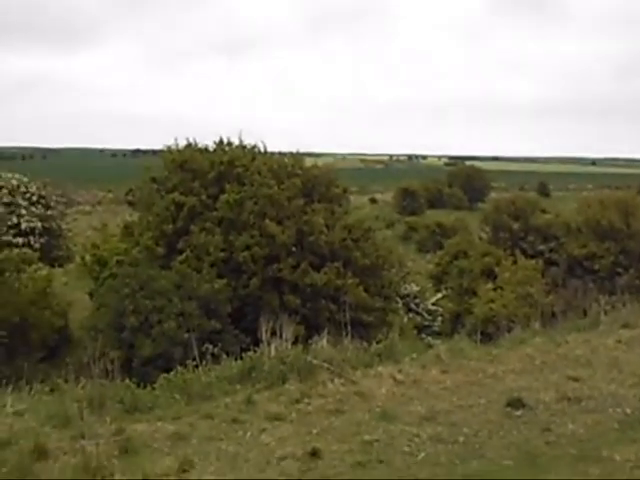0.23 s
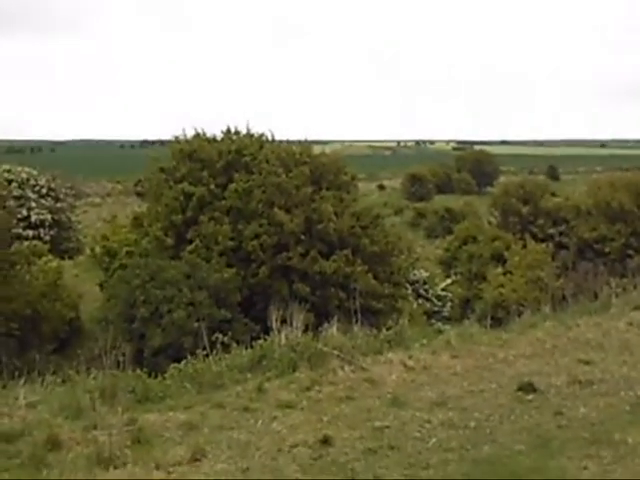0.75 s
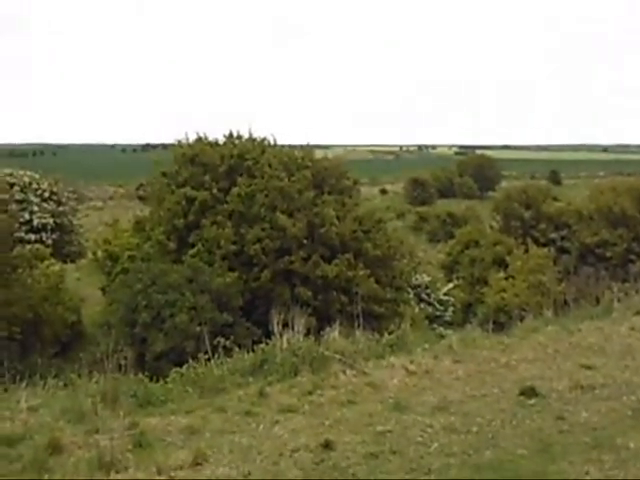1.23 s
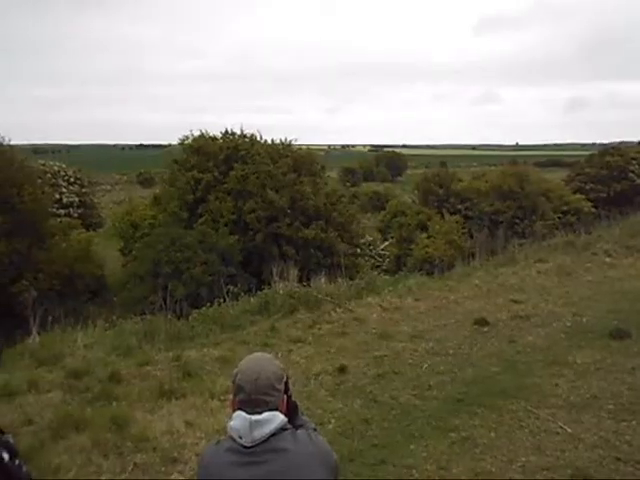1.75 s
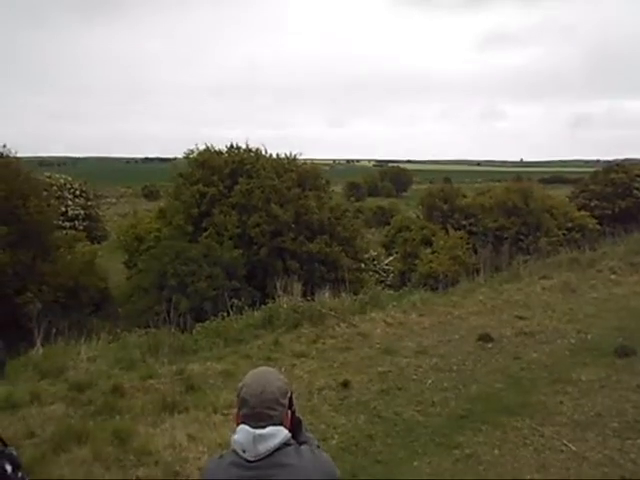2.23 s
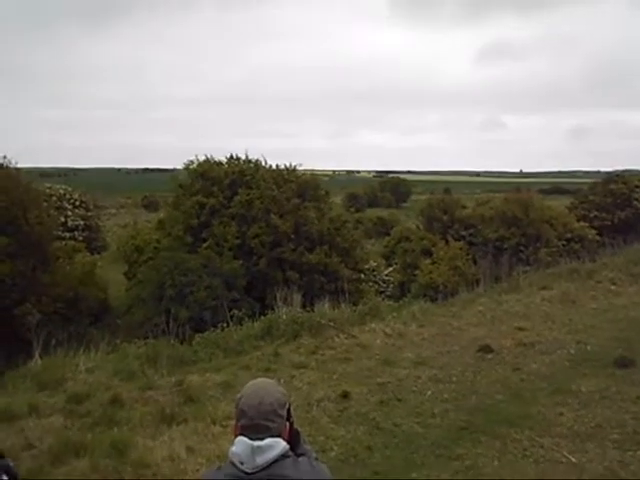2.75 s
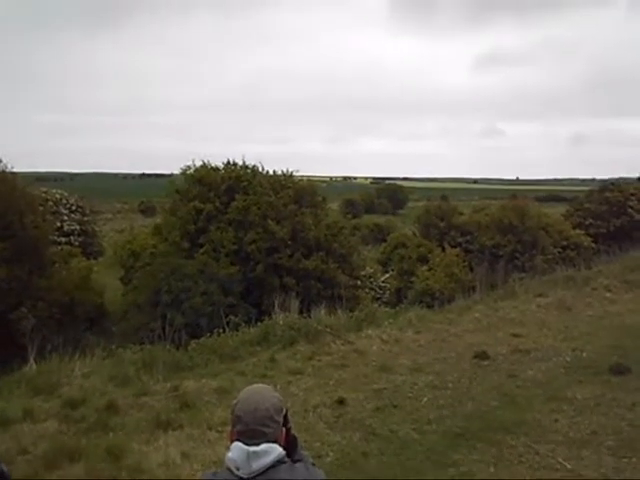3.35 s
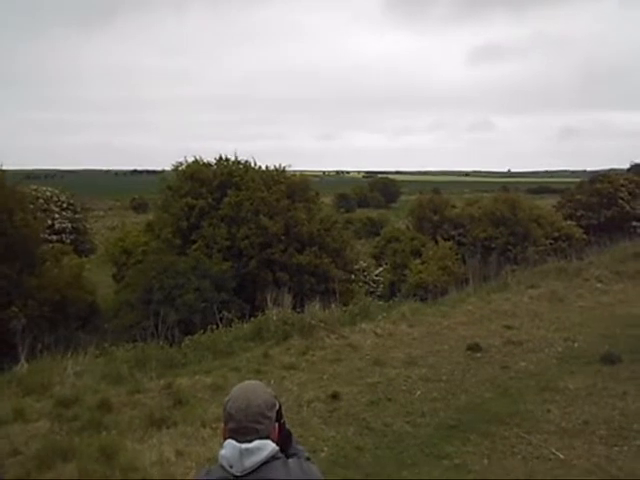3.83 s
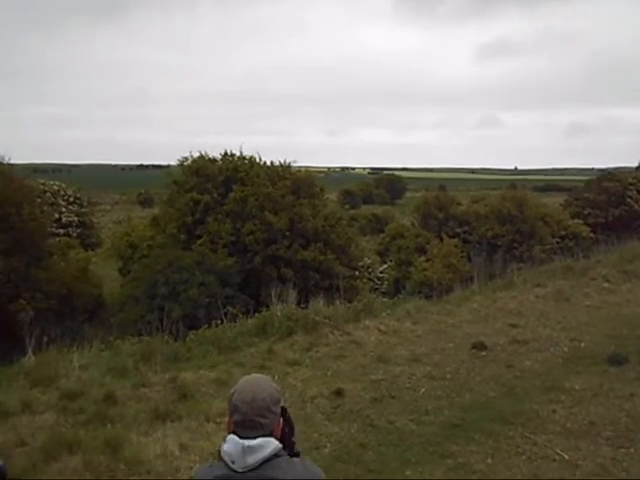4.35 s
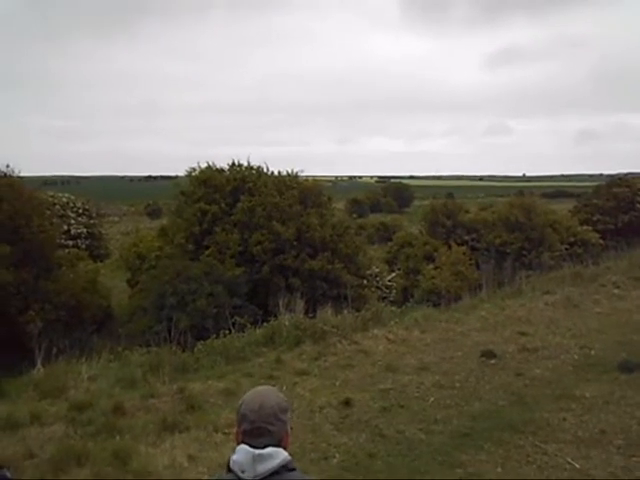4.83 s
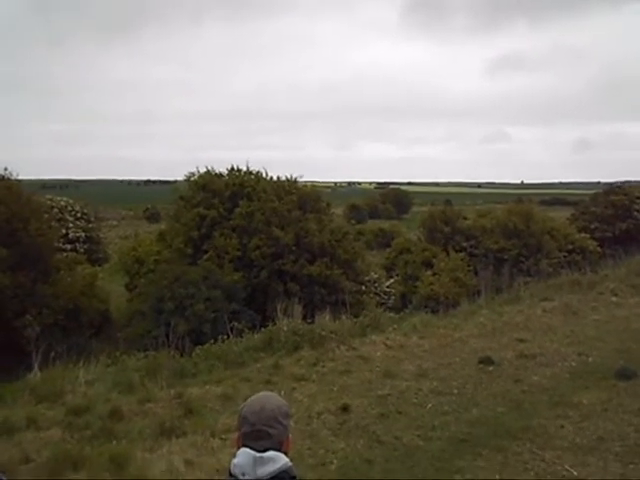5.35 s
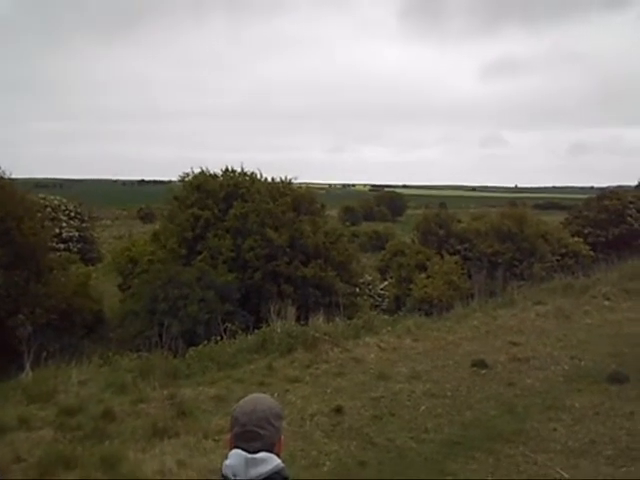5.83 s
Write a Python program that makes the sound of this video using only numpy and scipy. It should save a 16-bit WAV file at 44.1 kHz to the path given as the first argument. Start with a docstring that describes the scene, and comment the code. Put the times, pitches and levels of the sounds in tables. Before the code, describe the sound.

Small birds sing from bushes in open country, opening with a rattle of low chucks, then quick chirps, gliding whistles, high trills and faint buzzy churrs. Wind rumbles and thumps on the hand-held microphone, growing stronger toward the end. A soft hiss of distant leaves and a few handling clicks lie underneath, and the sound briefly drops out early on.

```python
"""Warblers sing from scrub across open fields: quick chirps, gliding whistles and buzzy churrs,
pitch-swept tones smeared by the bushes. Wind buffets a hand-held camera's microphone, which also hears
handling ticks and the hiss of far leaves. The sound drops out once and the hiss climbs back from faint.
Half-rate sampling gives the notes mirror images in the top octave, up to the band limit."""
import sys
import numpy as np
from scipy import signal
from scipy.fft import rfft, irfft, next_fast_len
from scipy.io import wavfile
from scipy.ndimage import uniform_filter1d, map_coordinates

SR = 44100
rng = np.random.default_rng(int(sys.argv[2]) if len(sys.argv) > 2 else 0)


def int16_out(signal):
    """Quantize to a 16-bit WAV file."""
    q = np.round(np.clip(np.atleast_2d(signal).T, -1, 1) * 32767)
    wavfile.write(sys.argv[1], SR, q.astype(np.int16))


N = 268569
DROP_START_S, DROP_END_S, OVERSHOOT_END_S = 1.417, 1.4365, 1.4845
CLEAR_HZ = 2000  # lower notes never count as faint


def short_notes():
    """Rows of (time [s], length [s], start, middle, end [Hz], level [dB], peak [0-1], steepness,
    flutter [dB])."""
    # rising, falling, near-level notes: (time [s], length [s], middle pitch [Hz], level [dB])
    hooks = [(2.388, 0.021, 4750, -21.5), (2.415, 0.024, 4060, -18), (2.418, 0.016, 3600, -20),
             (2.448, 0.03, 4320, -21), (2.453, 0.033, 3710, -20), (5.435, 0.023, 2480, -36),
             (5.533, 0.019, 3340, -31)]
    droops = [(.417, 0.013, 1870, -17.5), (5.506, 0.048, 3300, -32.5), (5.541, .05, 2890, -31.5)]
    pips = [(.18, 0.078, 4010, -39), (.435, .085, 3610, -43), (.758, 0.05, 4360, -39),
            (2.121, 0.045, 7270, -28), (2.762, 0.0099, 1675, -24), (3.181, 0.027, 2990, -30.5),
            (4.209, 0.012, 5230, -29), (4.531, 0.025, 6500, -33.5), (5.458, 0.012, 3080, -32),
            (5.477, 0.011, 3000, -31)]
    # tiny pips stepping down in pitch: (time [s])
    run_s = [2.188, 2.217, 2.234, 2.26, 2.29, 2.312, 2.33]
    # falling trill notes: (time [s], length [s], start [Hz], middle [Hz], end [Hz], level [dB])
    slides = [(2.141, 0.015, 7640, 6410, 6050, -16.5), (4.558, 0.039, 9250, 6970, 6470, -26.5),
              (4.598, .029, 9000, 7060, 6700, -23), (4.635, .034, 9000, 7480, 7000, -23.5),
              (4.927, 0.02, 7100, 6660, 6400, -25), (4.962, 0.0181, 7550, 7000, 5940, -19.5),
              (4.994, 0.028, 7870, 7170, 6450, -18.5), (5.036, .022, 8650, 7320, 6680, -13.5),
              (5.116, .07, 7200, 6640, 5830, -47)]
    # low rattle of falling chucks and soft rising lead-ins: (time [s], level [dB])
    chucks = [(0.233, -14), (0.333, -11), (0.501, -10.5), (0.604, -15.5), (0.707, -13.5), (0.824, -14.5),
              (0.922, -15)]
    lead_ins = [(0.301, -27), (0.465, -23.5), (0.568, -27.5), (0.671, -30.5), (0.785, -26), (0.882, -26),
                (1.032, -28.5)]
    fall_hz_per_s = 12300
    run = [(s, .0057, 5300 - fall_hz_per_s * (s - run_s[0]), -37) for s in run_s]
    notes = []
    for rows, start_ratio, end_ratio in (hooks, .73, 1), (droops, 1.07, .685), (pips + run, .95, 1):
        for s, length_s, hz, db in rows:
            notes.append((s, length_s, start_ratio * hz, hz, end_ratio * hz, db, .45, 1.1, 3.8))
    notes += [(*row, .62, .8, 3.5) for row in slides]
    notes += [(s, .017, 2735, 1800, 870, db, .07, 1.5, 1.5) for s, db in chucks]
    notes += [(s, .021, 1100, 1270, 1480, db, .6, 1.3, 2.5) for s, db in lead_ins]
    return notes


def chirps():
    """Short notes bend through three pitches; faint or very high ones come from deep in the scrub."""
    near, far = np.zeros(N), np.zeros(N)
    hiss_db = hiss_level_db()
    for s, length_s, start_hz, mid_hz, end_hz, db, peak, steepness, depth_db in short_notes():
        u = np.linspace(0, 1, round(length_s * SR))
        hz = start_hz * 2 * (u - .5) * (u - 1) + mid_hz * 4 * u * (1 - u) + end_hz * 2 * u * (u - .5)
        faint = db < hiss_db[round(s * SR)] + 11 and mid_hz > CLEAR_HZ
        flutter_db = (5.5 if faint else depth_db) * wobble(170, len(u))
        hz *= 1 + (.016 if faint else .001 * depth_db) * wobble(150, len(u))
        gain = amp(db + flutter_db) * swell(u, peak, steepness)
        sing(far if faint or start_hz > 7000 else near, s, hz, gain, octave_db=-42)
    return near, far


def whistles():
    """Gliding notes; faint ones come from far off and waver more."""
    # one contour per note: (time [s], pitch [Hz], level [dB])
    contours = [
        [(.18, 2510, -49), (.22, 4420, -36.5), (.33, 4384, -52)],
        [(.8, 3560, -48), (.9, 3225, -49), (1.1, 3166, -54)],
        [(1.633, 2690, -50), (1.645, 2570, -44), (1.656, 2580, -30), (1.665, 1840, -39), (1.676, 1240, -57)],
        [(1.84, 6340, -22), (1.846, 8030, -22.5), (1.855, 8420, -23.5), (1.866, 8040, -30), (1.878, 6750, -17),
         (1.89, 5850, -19.5), (1.905, 6200, -30)],
        [(2.93, 6080, -22), (2.96, 6270, -20.5), (3.105, 6696, -19.5), (3.119, 6960, -29), (3.13, 6770, -11.5),
         (3.142, 6924, -9.5), (3.16, 6882, -10.5), (3.17, 6900, -21)],
        [(3.35, 4560, -27), (3.365, 4800, -18.5), (3.39, 4720, -26), (3.41, 4840, -22), (3.425, 5670, -28.5),
         (3.445, 5650, -28), (3.46, 5350, -18), (3.475, 3920, -20), (3.485, 4000, -40)],
        [(3.865, 3960, -31), (3.877, 4050, -18), (3.884, 3780, -27), (3.892, 3830, -12), (3.901, 3950, -24),
         (3.91, 3920, -12), (3.93, 4080, -21), (3.955, 4280, -31.5), (4.0, 4080, -27)],
        [(4.004, 3900, -33), (4.013, 3970, -27), (4.025, 3755, -7.5), (4.037, 3150, -21), (4.045, 3395, -22)],
        [(5.09, 1677, -45), (5.15, 1660, -36), (5.23, 1642, -34.5), (5.32, 1637, -45), (5.44, 1674, -43)],
        [(5.262, 1016, -48), (5.285, 1167, -42), (5.335, 970, -44)],
        [(5.843, 2130, -40), (5.865, 2130, -30.5), (5.89, 2240, -13.5), (5.91, 2423, -22), (5.925, 2740, -25),
         (5.938, 2730, -40.5)],
        [(5.941, 3390, -36), (5.952, 3310, -4.5), (5.961, 2930, -15), (5.97, 2850, -17.5), (5.985, 2320, -17.5),
         (6.0, 2074, -25), (6.017, 2030, -41)],
    ]
    # second partial of each note: (relative level [dB])
    octaves_db = [-36, -40, -15, -40, -45, -19, -25, -34, -11.5, -1, -33, -28]
    near, far = np.zeros(N), np.zeros(N)
    hiss_db = hiss_level_db()
    for rows, octave_db in zip(contours, octaves_db):
        s, hz, db = np.transpose(rows)
        if hz[0] > CLEAR_HZ and db.max() < hiss_db[round(s[0] * SR)] + 10:
            far += glide(rows, octave_db, flutter_db=4.5, waver=.006)
        else:
            near += glide(rows, octave_db)
    return near, far


def double_chirps():
    """Both sides of the throat sing at once, each at its own pitch."""
    # chirps: (time [s], level [dB])
    onsets = [(1.12, -11.5), (1.198, -14)]
    # voices: (delay [s], pitch [Hz], relative level [dB])
    upper = [(0, 6360, -19), (.004, 6700, -10), (0.015, 7050, -0.5), (0.027, 7060, -4.5), (.031, 6800, 5.5),
             (0.034, 6350, -18)]
    lower = [(.004, 4010, -31), (.01, 5470, -7), (0.017, 5700, -10.5), (0.027, 5520, -2.5),
             (.034, 5350, -24)]
    return sum(glide(np.add(voice, [s, 0, db]), octave_db=-42)
               for s, db in onsets for voice in (upper, lower))


def nasal_notes():
    """Faint five-partial notes that scoop up to their pitch."""
    # (time [s], length [s], fundamental [Hz], level [dB], spectral peak [partial number])
    notes = [(1.509, 0.017, 1316, -48, 3), (1.597, 0.017, 1350, -43, 2.5)]
    track, slope_db_per_partial = np.zeros(N), 13
    for s, length_s, fundamental_hz, db, strongest in notes:
        u = np.linspace(0, 1, round(length_s * SR))
        hz = fundamental_hz * (1 - .13 * (1 - u) ** 3)
        for k in range(1, 6):
            gain = amp(db - slope_db_per_partial * abs(k - strongest))
            sing(track, s, k * hz, gain * swell(u, peak=.52, steepness=.59), octave_db=-60)
    return track


def churrs():
    """The gliding pitch shakes fast and unevenly; the level throbs with it."""
    # lone churrs: (time [s], length [s], start [Hz], end [Hz], level [dB])
    singles = [(1.546, 0.011, 7100, 4800, -39.5), (1.634, 0.01, 5680, 5670, -36),
               (3.265, 0.0264, 6520, 5700, -32), (3.282, 0.049, 4580, 2860, -31),
               (3.559, 0.057, 6430, 3100, -38.5), (3.684, 0.066, 5940, 3100, -30),
               (4.226, 0.025, 5540, 3470, -32), (4.283, 0.021, 1500, 1920, -33.5),
               (4.766, 0.07, 4920, 3960, -36.5), (4.898, 0.052, 3740, 4980, -33.5)]
    # rising churrs, each closed by a falling flick: (time [s], churr level [dB], flick level [dB])
    chatter = [(2.636, -41.5, -32.5), (2.77, -35, -32), (2.887, -35.5, -30.5), (3.006, -33, -32.5)]
    rises = [(s, .046, 3000, 5250, db) for s, db, _ in chatter]
    flicks = [(s + .063, .012, 5200, 3100, db) for s, _, db in chatter]
    track, shake_hz = np.zeros(N), 190
    for s, length_s, start_hz, end_hz, db in singles + rises + flicks:
        u = np.linspace(0, 1, round(length_s * SR))
        shake = 2 * np.pi * shake_hz * length_s * u + .56 * wobble(130, len(u))
        hz = start_hz + (end_hz - start_hz) * u
        hz *= 1 + .05 * np.sin(shake) + .11 * wobble(700, len(u))
        throb = amp(db + np.cos(shake) + 3.5 * wobble(350, len(u)))
        sing(track, s, hz, throb * swell(u, peak=.56, steepness=.2), octave_db=-13)
    return track


def opening_note():
    """A falling note under way at time zero, the scrub still scattering its higher start."""
    # (time [s], pitch [Hz], level [dB])
    contour = [(-.016, 8620, -22), (-.006, 7860, -13), (0, 6725, -12.5), (.006, 5200, -9),
               (.011, 4490, -17), (.017, 4620, -25)]
    lead_s = -contour[0][0]
    note = glide(np.add(contour, [lead_s, 0, 0]), octave_db=-25)
    scattered = scrub(note, t60_s=.051, wet_db=-5.5, hedge_db=-30)
    skip = round(lead_s * SR)
    return np.pad(scattered[skip:], (0, skip))


def glide(rows, octave_db, flutter_db=1.04, waver=0):
    """One note from (time [s], pitch [Hz], level [dB]) rows; moving leaves make its level flutter."""
    s, hz, db = np.transpose(rows)
    t = np.arange(s[0], s[-1], 1 / SR)
    hz, db = (uniform_filter1d(np.interp(t, s, v), size=130, mode="nearest") for v in (hz, db))
    hz *= 1 + waver * wobble(60, len(t))
    db += flutter_db * wobble(92.5, len(t))
    fade = np.clip(np.minimum(t - s[0], s[-1] - t) / .00097, 0, 1)
    note = np.zeros(N)
    sing(note, s[0], hz, fade * amp(db), octave_db)
    return note


def sing(track, s, hz, gain, octave_db):
    """Add a swept sine and its second partial to the track."""
    phase = 2 * np.pi * np.cumsum(hz) / SR + rng.uniform(0, 2 * np.pi)
    tone = gain * (np.sin(phase) + amp(octave_db) * np.sin(2 * phase))
    span = track[round(s * SR):][:len(hz)]
    span += tone[:len(span)]


def swell(u, peak, steepness):
    """Note envelope over u = 0-1, reaching 1 at u = peak."""
    return np.sin(np.pi / 2 * np.where(u < peak, u / peak, (1 - u) / (1 - peak))) ** steepness


def scrub(x, t60_s, wet_db, hedge_db):
    """Near twigs scatter a short tail, far hedges a faint long one; both change every quarter second."""
    tails, hop = np.zeros(N + SR), SR // 4
    t = np.arange(SR // 2) / SR
    decay = (amp(-60 * t / t60_s) + amp(hedge_db - 60 * t / .65)) * (t > .004)
    for start in range(0, N, hop):
        impulse = rng.standard_normal(len(t)) * decay
        wet = signal.fftconvolve(x[start:start + hop], impulse / np.linalg.norm(impulse))
        if start < DROP_END_S * SR:  # no tail outlasts the dropout
            wet = wet[:round(DROP_END_S * SR) - start]
        tails[start:start + len(wet)] += wet
    return x + amp(wet_db) * tails[:N]


def wind():
    """Eddies push the diaphragm in lumps; the stronger the gust, the brighter its edge."""
    # (time [s], level [dB])
    gusts = [(0, -34.5), (.35, -27), (.9, -37.5), (1.3, -30.5), (1.52, -40.5), (1.72, -28), (1.84, -28.5),
             (1.9, -20.5), (1.98, -34.5), (2.78, -23.5), (3.3, -33), (3.55, -24.5), (4.39, -30.5),
             (4.45, -19), (4.7, -24.5), (5.0, -18.5), (5.12, -27.5), (5.4, -27), (5.5, -18), (5.6, -29),
             (5.82, -28.5), (5.88, -21), (6.09, -20.5)]
    # spectra: (frequency [Hz], relative density [dB])
    buffet_spectrum = [(3, -20), (10, 2), (35, 1.5), (80, -7.5), (150, -21), (400, -62)]
    edge_spectrum = [(60, -11), (170, 2), (280, -6.5), (550, -38)]
    gust_db, lumps = curve(gusts), wobble(16)
    buffet = unit(amp(1.5 * lumps) * noise(buffet_spectrum, patchy_db=0))
    edge = unit(amp(3.2 * lumps + 4.5 * wobble(30)) * noise(edge_spectrum, patchy_db=2))
    return amp(gust_db) * buffet + amp(1.36 * gust_db - 9.5) * edge


def thumps():
    """A single eddy pushes or pulls the diaphragm; the pressure around it swings the other way."""
    # (time [s], peak [dB], width [s])
    eddies = [ (1.914, -23, 0.00079), (2.524, -16, 0.0017), (2.823, -6.5, 0.0067), (2.931, -9, 0.0024),
              (3.14, -14, 0.005), (4.426, -10, 0.003), (4.473, -12.5, 0.0013), (4.51, -10, 0.0025),
              (4.595, -13, 0.0023), (4.982, -9.5, 0.0019), (5.039, -10, 0.0023), (5.447, -15, .003),
              (5.529, -11.5, 0.0025), (5.86, -17, 0.0047), (6.035, -17.5, 0.0016), (6.052, -7.5, 0.0011)]
    track, half = np.zeros(N + SR), SR // 25
    t = np.arange(-half, half) / SR
    for (s, db, width_s), sign in zip(eddies, rng.choice([-1, 1], len(eddies))):
        push = np.exp(-.5 * (t / width_s) ** 2) - np.exp(-.5 * (t / (2.3 * width_s)) ** 2) / 3.17
        track[round(s * SR) - half:][:len(t)] += sign * amp(db) * push / push.max()
    return track[:N]


def ticks():
    """Fingers and strap click on the plastic body: a dying noise burst around one resonance."""
    # (time [s], peak [dB], centre [Hz], t60 [s])
    clicks = [(.531, -14.5, 5040, 0.0018), (0.551, -19, 1110, 0.041), (.583, -5, 7100, 0.011),
              (0.5856, -5, 3890, 0.0053), (0.833, -24.5, 670, 0.03), (3.055, -25.5, 716, .06),
              (3.688, -23, 1897, 0.039), (3.861, -17.5, 1330, 0.026), (5.665, -14.5, 5800, 0.068),
              (5.741, -19, 780, 0.019)]
    track, t = np.zeros(N), np.arange(SR // 10) / SR
    for s, db, hz, t60_s in clicks:
        band = signal.butter(2, [hz * .54, min(hz * 1.49, SR / 2.2)], "band", fs=SR)
        burst = signal.lfilter(*band, rng.standard_normal(len(t)) * amp(-60 * t / t60_s))
        track[round(s * SR):][:len(t)] += amp(db) * burst / np.abs(burst).max()
    return track


def hiss():
    """Far leaves: broad noise under a treble sizzle that comes and goes."""
    # spectra: (frequency [Hz], relative density [dB])
    air_spectrum = [(90, -45.5), (150, -6.5), (500, -6), (1300, -13.5), (5000, -18), (11000, -22.5)]
    sizzle_spectrum = [(4000, -20.5), (9500, 2), (11000, -2)]
    # sizzle against the broad hiss: (time [s], relative level [dB])
    treble = [(0, -7), (.5, -5.5), (.95, -12.5), (1.3, -6.5), (2.5, -14.5), (4.4, -10), (4.75, -2.5),
              (5.2, -18.5), (5.78, -5), (5.97, -12)]
    level_db = hiss_level_db()
    air = amp(level_db + .82 * wobble(12)) * noise(air_spectrum, patchy_db=1.5)
    sizzle = amp(level_db + curve(treble) + 2 * wobble(25)) * noise(sizzle_spectrum, patchy_db=1.5)
    return air + sizzle


def hiss_level_db():
    """Slow rise with one lull and one rustle; faint after the dropout, then a step up and a climb."""
    t = np.arange(N) / SR
    lull_db = -7 * np.exp(-((t - .083) / .064) ** 2)
    rustle_db = 11.5 * np.exp(-((t - .562) / .035) ** 2)  # a hand shifts on the camera
    normal_db = -40 + .37 * t + rustle_db + lull_db
    return_s, climb_db_per_s = 1.553, 30
    recovery_db = np.where(t < return_s, -69.5, -62.5 + climb_db_per_s * (t - return_s))
    return np.where(t < DROP_END_S, normal_db, np.minimum(normal_db, recovery_db))


def noise(spectrum, patchy_db):
    """Unit-rms noise coloured by (frequency [Hz], level [dB]) rows, with patches of random gain."""
    knots_hz, db = np.transpose(spectrum)
    bins = signal.stft(rng.standard_normal(N), nperseg=512)[2]
    patches = uniform_filter1d(rng.standard_normal(bins.shape), size=12, axis=0)
    patches = uniform_filter1d(patches, size=10, axis=1)
    patchy = signal.istft(bins * amp(patchy_db * unit(patches)), nperseg=512)[1][:N]
    colour = lambda hz: amp(np.interp(np.log(hz + 1), np.log(knots_hz), db, right=-120))
    return unit(filtered(patchy, colour))


def filtered(x, response):
    """Apply a gain given as a function of frequency."""
    size = next_fast_len(N + 8192)
    return irfft(rfft(x, size) * response(np.fft.rfftfreq(size, 1 / SR)), size)[..., :N]


def wobble(rate_hz, size=N):
    """Smooth random curve through rate_hz knots a second."""
    knots = rng.standard_normal(int(size * rate_hz / SR) + 4)
    return map_coordinates(knots, [np.arange(size) * rate_hz / SR])


def curve(rows):
    """One value per sample from (time [s], value) rows."""
    return np.interp(np.arange(N) / SR, *np.transpose(rows))


def amp(db):
    """dB to gain."""
    return 10 ** (np.asarray(db) / 20)


def unit(x):
    """Scale to rms 1."""
    return x / np.sqrt(np.mean(x ** 2) + 1e-20)


def scene():
    """Birds near and far in the scrub; wind and hands at the camera. Mono."""
    near_chirps, far_chirps = chirps()
    near_whistles, far_whistles = whistles()
    near_song = near_chirps + near_whistles + double_chirps() + nasal_notes()
    near = scrub(near_song, t60_s=.091, wet_db=-11, hedge_db=-16.5)
    far = scrub(far_chirps + far_whistles + churrs(), t60_s=.12, wet_db=-5, hedge_db=-26)
    return (opening_note() + near + far + ticks() + wind() + hiss() + thumps())[None]


def record(dry):
    """One dropout with a gain overshoot, half-rate sampling that mirrors the spectrum, a band limit."""
    t = np.arange(N) / SR
    antialias_hz, shelf_hz, cut_hz = 10750, 15750, 17044
    gain_db = np.select([t < DROP_START_S, t < DROP_END_S, t < OVERSHOOT_END_S], [0, -21, 9], 0)
    lowpassed = filtered(dry, lambda hz: 1 / np.sqrt(1 + (hz / antialias_hz) ** 40))
    interrupted = lowpassed * amp(gain_db)
    held = np.repeat(interrupted[:, ::2], 2, axis=1)[:, :N]
    return filtered(held, lambda hz: amp(-44 * np.clip((hz - shelf_hz) / 120 + .5, 0, 1)) * (hz < cut_hz))


dry = scene()
out = record(dry)
int16_out(out)
```